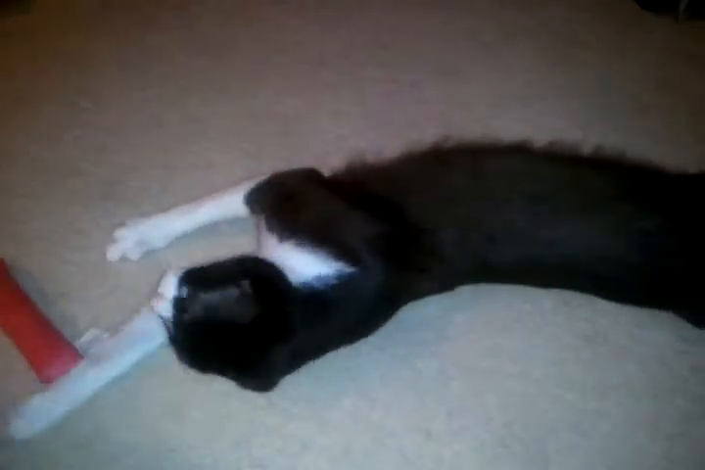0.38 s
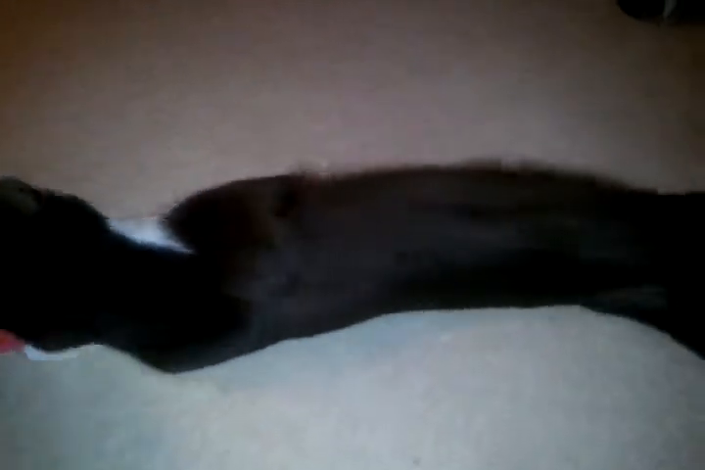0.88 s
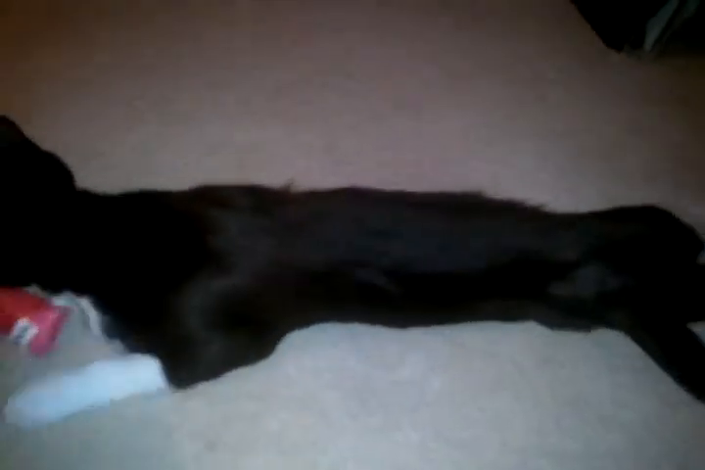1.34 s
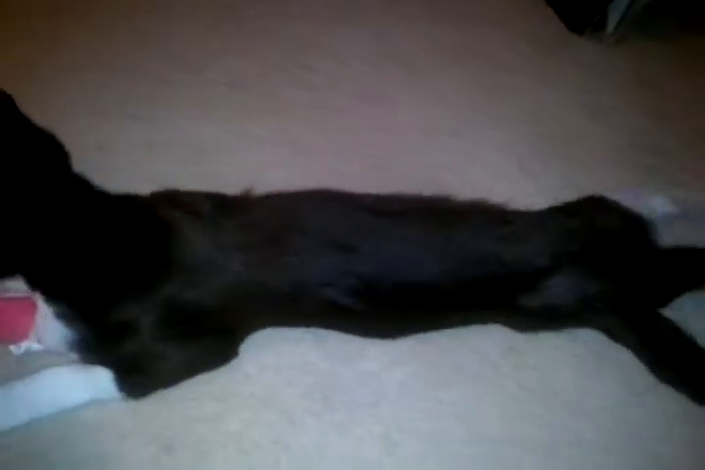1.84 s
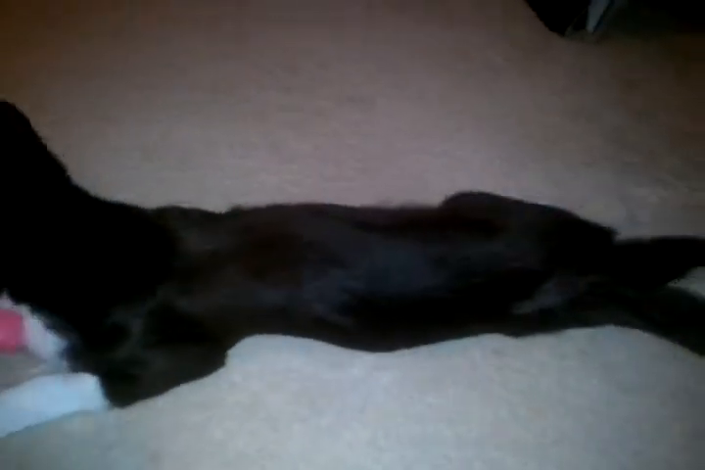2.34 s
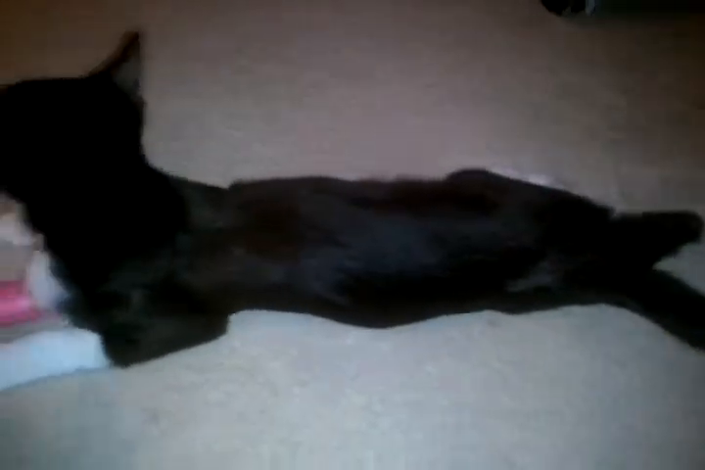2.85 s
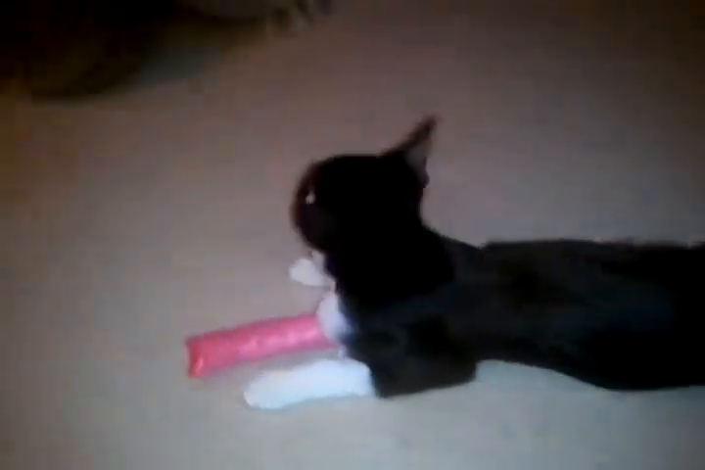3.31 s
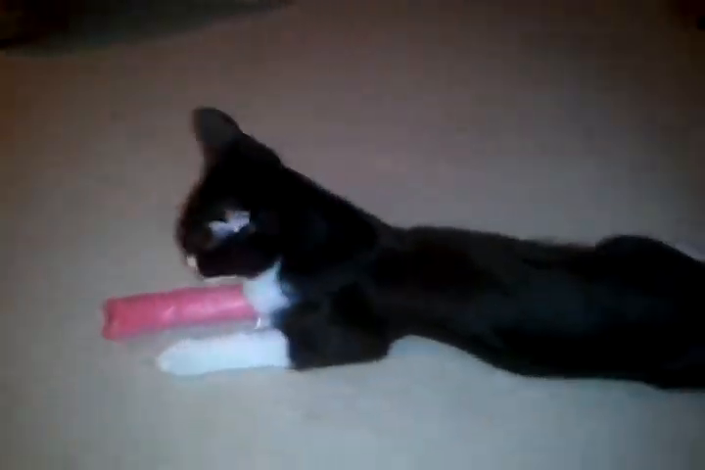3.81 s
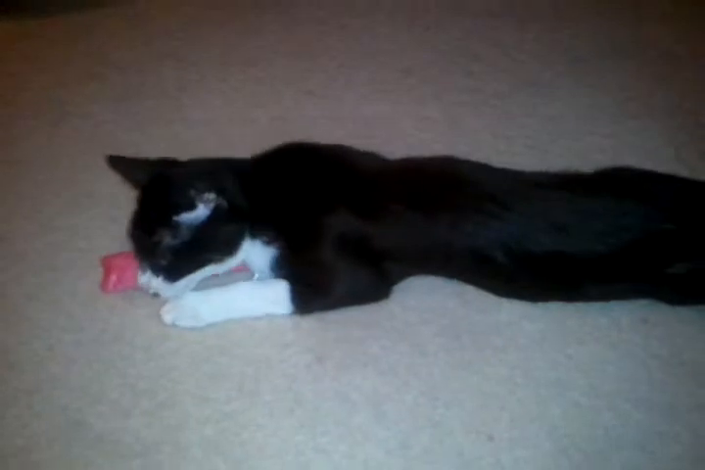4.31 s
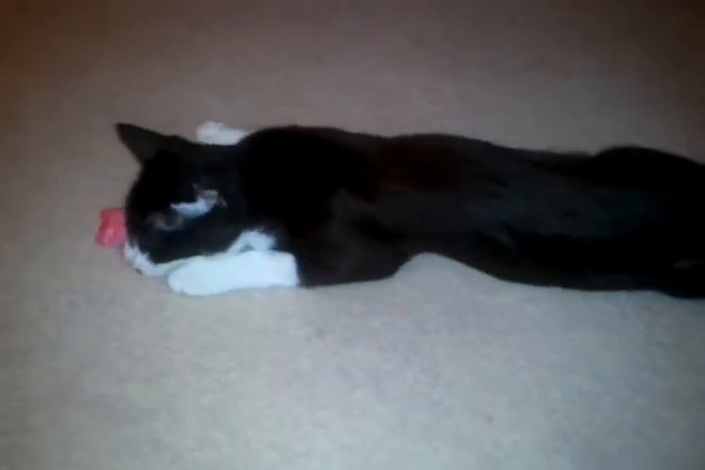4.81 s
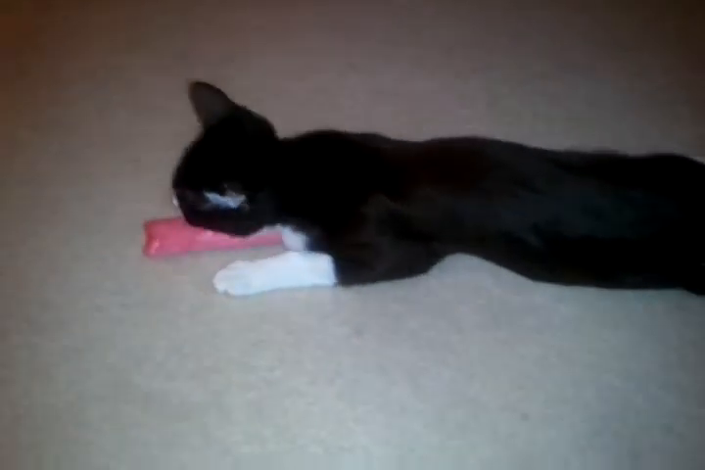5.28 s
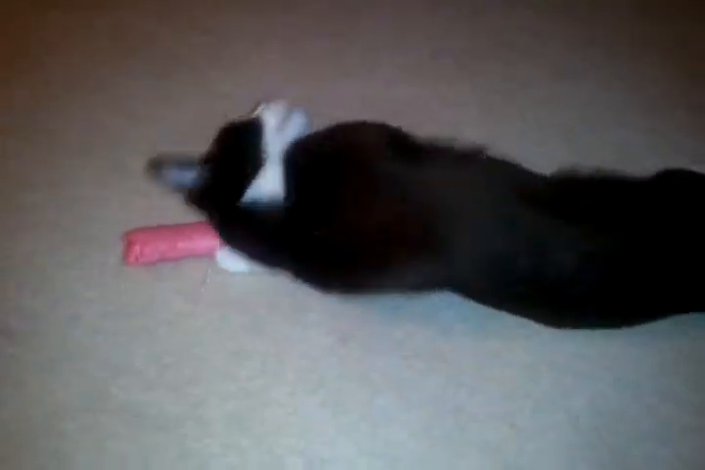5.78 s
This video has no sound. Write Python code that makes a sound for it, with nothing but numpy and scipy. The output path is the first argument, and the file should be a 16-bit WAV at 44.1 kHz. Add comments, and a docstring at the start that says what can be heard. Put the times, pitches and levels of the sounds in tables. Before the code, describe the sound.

A cat plays with a crinkly stuffed toy on indoor carpet, close to a modest camera microphone with dulled treble. Low wavering mains hum, slowly beating at first, sits under faint hiss throughout. For the first second there is only very soft rustling and a few thin, high tones. From about 1.2 to 1.6 seconds, bright tiny snaps crackle densely, ending in the sharpest crack. Faint gliding tinkles follow near 1.7-1.9. Another snap cluster comes at 2.2, with smaller ones until 2.95. Around 3.5 a dull wooden knock and its bounce sound further away with short room echo; more knocks follow near 3.7, 3.95 and 4.1, some clackier. A soft drag over carpet leads into sparse crinkles from 4.4. A strong snap hits at 5.27, followed by thin tones, then frequent small crackles and rustles continue to the end, just after 6 seconds.

```python
"""In a carpeted room, a cat claws and chews a small stuffed toy near a camera.
The crinkly filling snaps in short bright bursts and rustles as shaped noise.
Further off something knocks on wood, made of ringing modes and bursts of noise.
Thin high gliding tones tinkle now and then, and wavering mains hum sits in the room's hiss."""
import sys
import numpy as np
from scipy import signal
from scipy.fft import rfft, irfft, next_fast_len
from scipy.io import wavfile
from scipy.ndimage import map_coordinates

SR = 44100
rng = np.random.default_rng(int(sys.argv[2]) if len(sys.argv) > 2 else 0)


def undo_db(level):
    """Turn decibels back into plain size, where 20 dB means ten times bigger."""
    steps = np.asarray(level, float) / 20
    return 10 ** steps


def waveform_to_disk(signal):
    """Save audio, clipped to [-1, 1], as 16-bit WAV at the path in sys.argv[1]."""
    frames = np.transpose(np.atleast_2d(signal))
    scaled = np.clip(frames, -1, 1) * 32767
    samples = np.round(scaled).astype(np.int16)
    wavfile.write(sys.argv[1], SR, samples)


N = 271464  # length of the scene in samples

# bouts of pawing and chewing:
# (start [s], length [s], cloth level [dB], small snaps at the height of the bout [per s])
BOUTS = [(0, 0.265, -65, 0), (0.33, 0.31, -65, 0), (0.79, 0.39, -64, 0), (1.182, 0.35, -58, 22.5),
         (1.483, 0.086, -55.5, 40), (1.557, .09, -58, 10), (2.157, 0.18, -55.5, 50),
         (2.432, 0.089, -66, 14.5), (2.572, 0.15, -70, 25), (2.751, 0.11, -64, 30.5), (3.002, 0.39, -61, 0),
         (3.39, 0.34, -60.5, 20.5), (3.707, 0.34, -68, -0.5), (4.272, .13, -64, 0), (4.379, 0.146, -56, 60),
         (4.629, 0.29, -63, 20), (4.941, 0.141, -59, 3.5), (5.22, 0.14, -62, 11), (5.422, 0.26, -73, 20),
         (5.58, 0.32, -61, 25), (5.866, 0.13, -64, 33.5), (5.962, 0.1216, -57, 35)]


def unit(x):
    """Scales a sound to an rms of 1."""
    return x / np.sqrt(np.mean(x ** 2) + 1e-20)


def wobble(rate):
    """A smooth random curve through `rate` random points a second."""
    knots = rng.standard_normal(int(N * rate / SR) + 4)
    return map_coordinates(knots, [np.arange(N) * rate / SR])


def along(points, hz):
    """Reads a table of (frequency [Hz], value) on a log frequency axis."""
    f, value = np.transpose(points)
    return np.interp(np.log(hz + 1), np.log(f + 1), value)


def filtered(x, response):
    """Multiplies the spectrum of x by a response, a function of frequency in Hz."""
    m = next_fast_len(N + 8192)
    return irfft(rfft(x, m) * response(np.fft.rfftfreq(m, 1 / SR)), m)[..., :N]


def coloured(x, spectrum):
    """Shapes x with a table of (frequency [Hz], gain [dB]), then scales it to an rms of 1."""
    return unit(filtered(x, lambda hz: undo_db(along(spectrum, hz))))


def band(x, low_hz, high_hz):
    """Keeps the band between two frequencies, without sounding ahead of time."""
    return signal.lfilter(*signal.butter(2, [low_hz, high_hz], "band", fs=SR), x)


def add(track, s, sound):
    """Mixes a sound into a track at s seconds."""
    part = track[round(s * SR):][:len(sound)]
    part += sound[:len(part)]


def swells(rows):
    """A curve of rounded humps, from rows of (start [s], length [s], height)."""
    out = np.zeros(N)
    for s, length, height in rows:
        progress = np.arange(round(length * SR)) / (length * SR)
        add(out, s, height * np.sin(np.pi * progress) ** 0.8)  # lower power = squarer hump
    return out


def snaps():
    """Each crease lets go as a few bright cycles, rebounds, crackles out, and thuds into the stuffing."""
    # snaps of the filling at set times, faint to loud:
    # (time [s], level of the bright cycles [dB], pitch [Hz], thud against those cycles [dB])
    timed_snaps = [(1.1929, -45, 4600, -16), (1.2195, -38, 5083, -19), (1.2488, -45, 5460, -18.5),
                   (1.271, -38, 5030, -23), (1.278, -28, 6300, -14), (1.2841, -31, 6190, -21.5),
                   (1.2943, -37.5, 4920, -18), (1.3134, -39, 5090, -13), (1.3202, -30.5, 5200, -10.5),
                   (1.3429, -40, 5000, -16), (1.348, -31.5, 4930, -22), (1.3935, -34.5, 6380, -19.5),
                   (1.3996, -31.5, 5500, -9), (1.4316, -44.5, 4860, -1), (1.4914, -37, 6230, -14),
                   (1.496, -43, 4570, -18), (1.5004, -36, 5190, -16.5), (1.509, -29.5, 4580, -12),
                   (1.5194, -30, 4950, -13.5), (1.5236, -43, 5600, -12.5), (1.5524, -40, 4870, -22.5),
                   (1.571, -18, 4920, -18.5), (2.1832, -35, 4800, -19), (2.1937, -41, 5990, -16),
                   (2.203, -39, 4850, -20), (2.2086, -36.5, 5880, -17), (2.2359, -27, 5760, -14),
                   (2.2428, -30.5, 5870, -10.5), (2.2608, -27, 5280, -22), (2.2631, -32, 5017, -20),
                   (2.2765, -28, 5450, -22), (2.4612, -32, 4368, -14.5), (2.4827, -34.5, 6530, -23),
                   (2.4857, -41, 5710, -16), (2.4929, -33.5, 6120, -24), (2.608, -36, 5480, -10),
                   (2.6633, -47, 4200, -11), (2.6714, -45.5, 6450, -14), (2.7844, -34, 5450, -12),
                   (2.8, -27, 5194, -15), (2.823, -45.5, 4780, -16), (2.9414, -33, 4720, -21),
                   (2.947, -38, 5030, -18), (4.4089, -37, 5040, -18), (4.4787, -37, 5260, -16.5),
                   (4.6514, -38, 6060, -19.5), (4.7102, -37.5, 6100, -13.5), (4.728, -40.5, 4520, -7),
                   (4.792, -47, 5700, -16), (4.8155, -40.5, 5200, -16), (4.9854, -36.5, 5620, -23),
                   (5.069, -39.5, 5150, -15), (5.231, -41, 4930, -12), (5.2637, -32.5, 5670, -9.5),
                   (5.2729, -20, 5680, -21), (5.2879, -40.5, 5830, -13.5), (5.3243, -36.5, 4990, -12),
                   (5.5191, -42.5, 5050, -13), (5.5612, -36.5, 5430, -21), (5.6086, -32.5, 5530, -16),
                   (5.6227, -32.5, 5510, -18), (5.6271, -36.5, 5320, -14), (5.6487, -34.5, 5420, -27),
                   (5.6675, -40, 5670, -11.5), (5.7137, -41.5, 5495, -18), (5.7319, -30.5, 4780, -19),
                   (5.7366, -32.5, 5000, -16), (5.7402, -31, 5400, -21), (5.7793, -31, 5200, -20),
                   (5.7817, -37, 5560, -15), (5.8127, -39.5, 5600, -16.5), (5.8277, -39.5, 4760, -16),
                   (5.8641, -45, 4960, -16), (5.889, -36, 4880, -10.5), (5.9071, -37, 5940, -11),
                   (5.9567, -39.5, 5050, -15), (5.9724, -37, 5500, -22), (6.0123, -38.5, 3940, -11),
                   (6.0165, -33, 4930, -17), (6.0307, -39, 5390, -16)]
    out, t = np.zeros(N), np.arange(SR // 80) / SR
    after = t - .001  # seconds after the peak of the snap
    for s, db, hz, thud_db in [*timed_snaps, *small_snaps()]:
        noise = rng.standard_normal(len(t))
        pitch, late, tune = rng.random(3)
        ping = np.exp(-(after / 0.00026) ** 2) * np.sin(2 * np.pi * hz * t)
        # a later rebound is also a stronger one
        rebound_shape = 0.97 * late * np.exp(-((after - .0007 - 0.00064 * late) / 0.00075) ** 2)
        rebound = rebound_shape * np.sin(2 * np.pi * hz * (0.89 + 0.64 * tune) * t)
        crackle = 0.76 * band(band(noise, 2680, 7620), 2400, 8000)
        crackle = crackle * undo_db(-60 * after / 0.0071) * (after > 0)
        thud = np.exp(-(after / 0.000417) ** 2) * np.sin(2 * np.pi * (1050 + 700 * pitch) * t)
        add(out, s, undo_db(db) * (ping + rebound + crackle + undo_db(thud_db) * thud))
    return out


def small_snaps():
    """Faint creases let go at random while a bout lasts; gives rows like those of the timed snaps."""
    level_db, pitch_hz, thud_db = -45.5, 5230, -19  # middle values of the random spread
    when, chance = rng.random((2, 600))  # candidate moments, as fractions of the scene
    size, tune, depth = rng.standard_normal((3, len(when)))
    rate = swells([(s, length, per_s) for s, length, _, per_s in BOUTS])
    candidates_per_s = len(when) * SR / N
    chosen = chance * candidates_per_s < rate[(when * N).astype(int)]
    rows = [when * N / SR, level_db + size, pitch_hz * (1 + 0.14 * tune), thud_db + 7 * depth]
    return list(np.transpose(rows)[chosen])


def rustle():
    """Dense tiny creases over a soft hiss of fur and cloth, and a duller drag over the carpet pile."""
    # colour of the cloth noise: (frequency [Hz], relative level [dB])
    cloth_colour = [(1500, -30.5), (3000, -9), (4500, -4.5), (5800, -3), (7000, -3.5), (8000, -16.5),
                    (9000, -36.5)]
    # colour of the drag noise: (frequency [Hz], relative level [dB])
    drag_colour = [(400, -9), (800, -6), (1500, -6.5), (2500, -6.5), (3500, -18), (6000, -21.5)]
    # body sliding on the pile: (start [s], length [s], level [dB])
    slide_rows = [(3.378, 0.12, -65.5), (3.6, 0.43, -66), (4.262, .22, -58.5)]
    cloth_rest_db, drag_rest_db = -68.5, -69
    drag_follows_db = -9  # drag against the cloth level of a bout

    bouts = swells([(s, length, undo_db(db)) for s, length, db, _ in BOUTS])
    slides = swells([(s, length, undo_db(db)) for s, length, db in slide_rows])

    # clicks of random size and sign, about 600 a second in drifting density
    sizes = undo_db(np.minimum(3 * rng.exponential(size=N), 9)) * np.sign(rng.standard_normal(N))
    happens = rng.random(N) < 600 / SR * undo_db(5 * wobble(25))
    creases = unit(happens * sizes)

    cloth = coloured(.5 * creases + rng.standard_normal(N), cloth_colour)
    cloth_gain = np.hypot(undo_db(cloth_rest_db), bouts) * undo_db(1.9 * wobble(24))
    drag = coloured(0.34 * creases + rng.standard_normal(N), drag_colour)
    drag_power = undo_db(drag_rest_db) ** 2 + (undo_db(drag_follows_db) * bouts) ** 2 + slides ** 2
    return cloth_gain * cloth + np.sqrt(drag_power) * drag


def knocks():
    """A hard blow reaches the high modes and clacks, a soft one only the low; the spot favours one mode."""
    # knocks and their bounces:
    # (time [s], strength [dB], lowest mode reached [Hz], favoured mode [Hz], hardness [Hz])
    blows = [(2.856, -54, 500, 649, 1000), (3.5384, -38.5, 166, 214, 950), (3.56, -43.5, 400, 562, 1150),
             (3.726, -47, 330, 1240, 2380), (3.954, -43, 190, 214, 774), (4.115, -39.5, 272, 457, 2370),
             (4.132, -49.5, 270, 288.4, 2400), (5.151, -53.5, 349, 457, 1350),
             (5.272, -51.5, 298, 457, 520), (5.462, -54, 357, 457, 1350)]
    # ringing modes of the wood: (frequency [Hz], relative level [dB], time to fall 60 dB [s])
    wood_modes = [(214, -3.5, 0.11), (289.6, -8, 0.13), (457, 3, 0.035), (562, 0.5, 0.037),
                  (619.1, -7, 0.043), (753.8, -15, 0.058), (894, -13.5, 0.098), (1192, -10.5, 0.09),
                  (1660, -18.5, 0.033), (2200, -13, .04), (2330, -8, 0.053), (2580, -27, .03)]
    scatter_db = 2  # each blow excites the modes a little differently
    push_db = 4  # first cycle of a blow
    clack_from_hz, clack_db = 1210, 18  # blows harder than this clack
    clack_tip = 3.8  # click added to the noise at the first instant of a clack

    out, t = np.zeros(N), np.arange(SR // 4) / SR
    for s, db, low_hz, spot_hz, hard_hz in blows:
        ring = np.zeros(len(t))
        for hz, level, t60 in wood_modes:
            reach = 1 / (1 + (hz / hard_hz) ** 4) / (1 + (low_hz / hz) ** 8)
            favour = undo_db(9.6 * np.exp(-(np.log(hz / spot_hz) / 0.027) ** 2))
            fade = undo_db(level + scatter_db * rng.standard_normal() - 60 * t / t60)
            ring += fade * reach * favour * np.sin(2 * np.pi * hz * t)

        contact_noise, clack_noise = rng.standard_normal((2, len(t)))
        # the jumble before the modes sort out
        contact = band(band(contact_noise, low_hz, hard_hz), low_hz, hard_hz)
        contact = 1.78 * unit(contact) * undo_db(-60 * t / 0.035)
        cycle = t * np.sqrt(low_hz * hard_hz)
        push = np.sin(2 * np.pi * cycle) * np.exp(-(cycle / .9) ** 2)
        push = undo_db(push_db) * band(push, low_hz, 2 * hard_hz)

        clack_gain = undo_db(clack_db) / (1 + (clack_from_hz / hard_hz) ** 24)
        clack = band(clack_noise + clack_tip * (t == 0), 1600, 5120) * undo_db(-60 * t / 0.018)
        onset = 1 - np.exp(-t / 0.00098)
        add(out, s, undo_db(db) * ((ring + contact + push) * onset + clack_gain * clack))
    return out


def tinkles():
    """Thin, slightly hoarse tones that swell, glide in pitch and fade while their level flutters."""
    # thin tones: (start [s], length [s], start pitch [Hz], glide by the end [Hz], level before flutter [dB])
    tones = [(0.203, .04, 3580, -30, -69), (0.392, .045, 5300, -150, -63), (0.454, 0.06, 4535, -24, -63),
             (.53, .04, 3910, -29, -65), (1.648, 0.108, 6160, -110, -57), (1.771, 0.072, 6100, 37, -59),
             (1.798, 0.093, 6330, 65.5, -54.5), (1.859, 0.045, 3870, -7, -71),
             (1.911, .041, 6400, -10, -72), (2.293, 0.088, 4500, -42.5, -61),
             (2.308, 0.042, 4200, -52.5, -62), (2.335, .06, 3870, -22, -67), (2.489, .076, 6220, -30, -62),
             (5.313, .03, 6500, -29, -64), (5.353, 0.045, 6450, -21, -56.5),
             (5.396, 0.052, 6056, -20, -56.5), (6.051, .065, 6510, -32.5, -61.5),
             (6.058, 0.097, 6700, -15, -66)]
    flutter = undo_db(3.5 * wobble(70))
    hoarse = .8 * wobble(200)  # phase jitter in radians
    out = np.zeros(N)
    for s, length, start_hz, glide_hz, db in tones:
        t = np.arange(round(length * SR)) / SR
        turns = start_hz * t + glide_hz * t ** 2 / (2 * length)
        phase = 2 * np.pi * turns + np.resize(hoarse[round(s * SR):], len(t))
        swell = np.abs(np.sin(np.pi * t / length)) ** 0.5
        add(out, s, undo_db(db) * swell * np.sin(phase))
    return out * flutter


def background():
    """Wavering mains hum, at first beating with a nearby tone that fades out, over rumble and hiss."""
    # colour of the rumble and hiss: (frequency [Hz], relative level [dB])
    hiss_colour = [(8, -31), (14, -10.5), (30, -16.5), (45, -20), (75, -17.5), (130, -23), (200, -25.5),
                   (500, -31.5), (720, -36), (2100, -44), (4000, -46), (5500, -43.5), (7000, -59.5),
                   (8000, -56.5), (9000, -70), (11000, -110)]
    t = np.arange(N) / SR
    low_gain = undo_db(-59 - 0.45 * t + 2.7 * wobble(6))  # sags slowly, in dB per second
    low = low_gain * np.sin(2 * np.pi * 60 * t + 1.1 * wobble(8))
    neighbour_ends_s, neighbour_fade_s = 1.8, 0.38
    fading = undo_db(-54.5 + 1.4 * wobble(3)) / (1 + np.exp((t - neighbour_ends_s) / neighbour_fade_s))
    neighbour = fading * np.sin(2 * np.pi * 57.3 * t + 2.68 + .2 * wobble(6))
    high = undo_db(-56 + 2.5 * wobble(4.2)) * np.sin(2 * np.pi * 119.8 * t + 0.15 * wobble(15.0))
    third = undo_db(-74.0 + 1.5 * wobble(5.7)) * np.sin(2 * np.pi * 180 * t + 1.0 * wobble(5))
    hiss = undo_db(-59) * coloured(rng.standard_normal(N), hiss_colour)
    return low + neighbour + high + third + hiss


def room(x):
    """Near walls, then a tail dying faster in the treble; drawn anew every quarter second."""
    # how long the room rings: (frequency [Hz], time to fall 60 dB [s])
    ring_times = [(200, 0.41), (1000, 0.26), (4000, 0.21), (8000, 0.19)]
    out, step = np.zeros(N), SR // 4
    for start in range(0, N, step):
        hz, t, z = signal.stft(rng.standard_normal(SR // 3), SR, nperseg=128)
        wall = 2.5 * np.exp(-((t - .018) / 0.001) ** 2)  # a wall answers together near 18 ms
        swell = 1 - np.exp(-t / 0.00053) + wall
        decay = undo_db(-60 * t / along(ring_times, hz)[:, None])
        tail = signal.istft(z * swell * decay, SR, nperseg=128)[1]
        echo = signal.fftconvolve(x[start:start + step], tail / np.linalg.norm(tail))
        add(out, start / SR, echo)
    return out


def scene():
    """Near snaps with a little room, far knocks with much, and the other layers without it."""
    near, far = snaps(), knocks()
    wet = room(undo_db(-9.5) * near + undo_db(-2.5) * far)
    return (near + far + wet + rustle() + tinkles() + background())[None]


def top_cut(x):
    """Nothing passes above the cut-off."""
    return signal.sosfilt(signal.butter(12, 8900, fs=SR, output="sos"), x)


def record(dry):
    """The camera rolls off steeply in the treble and its converter adds a small, slowly settling offset."""
    # settling converter offset: (time [s], offset [fraction of full scale])
    offset_rows = [(0, .0155), (.6, .0142), (1.4, .0134), (3, .0118), (6.16, .011)]
    top_hz = 6906  # the treble is halved here
    dull = filtered(dry, lambda hz: 1 / (1 + (hz / top_hz) ** 11) * (hz < 8950))
    offset = np.interp(np.arange(N) / SR, *np.transpose(offset_rows))
    return top_cut(dull + offset)


dry = scene()
out = record(dry)
waveform_to_disk(out)
```